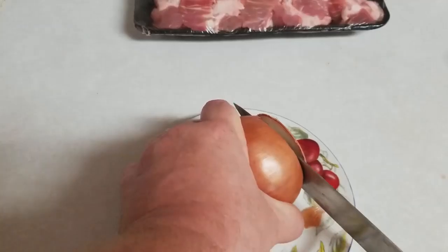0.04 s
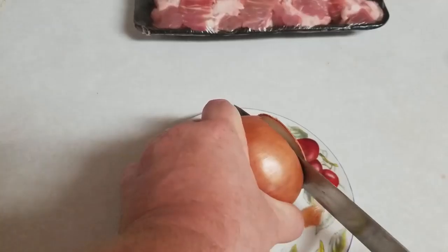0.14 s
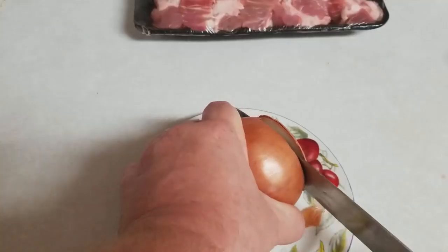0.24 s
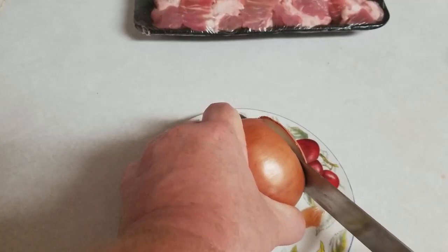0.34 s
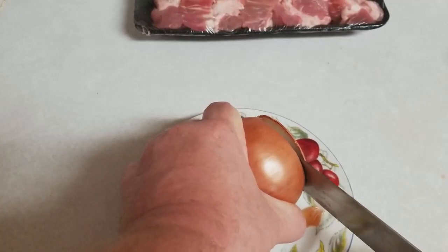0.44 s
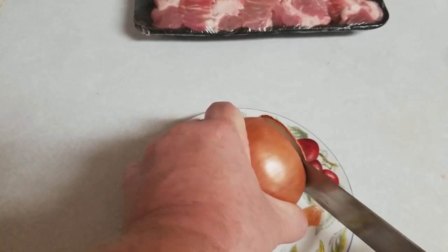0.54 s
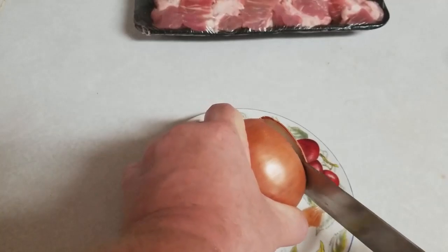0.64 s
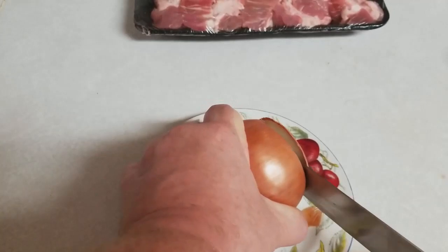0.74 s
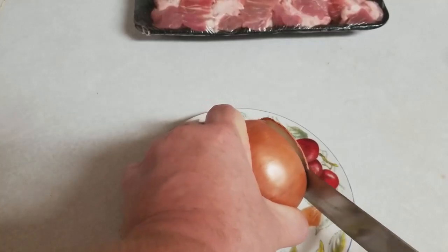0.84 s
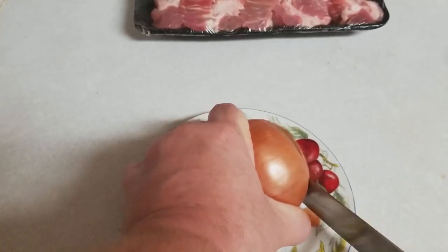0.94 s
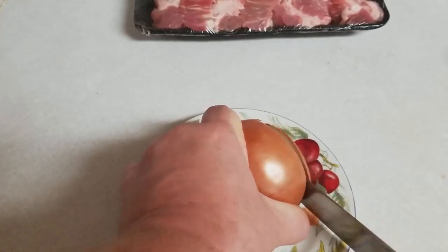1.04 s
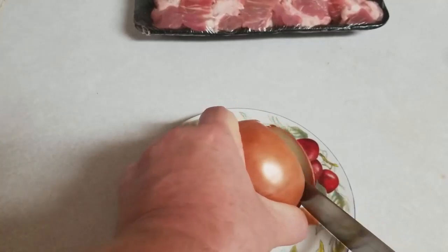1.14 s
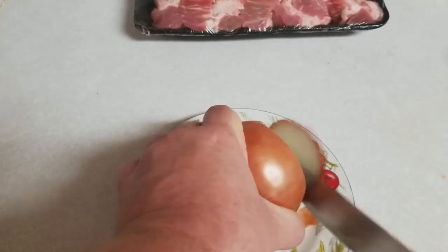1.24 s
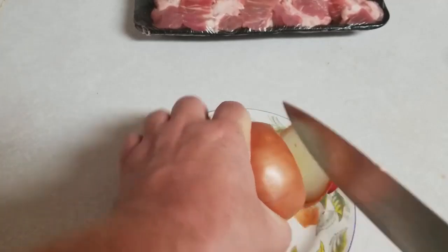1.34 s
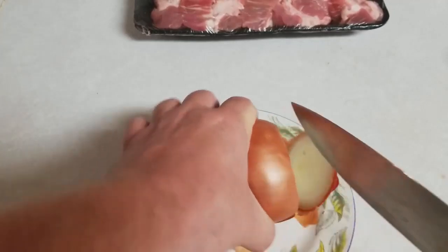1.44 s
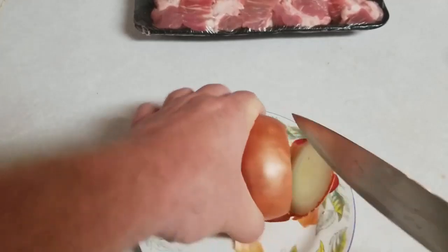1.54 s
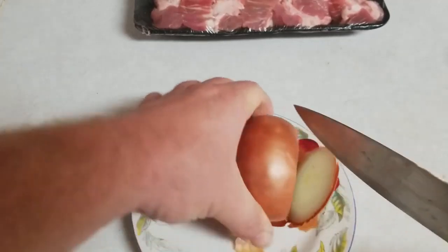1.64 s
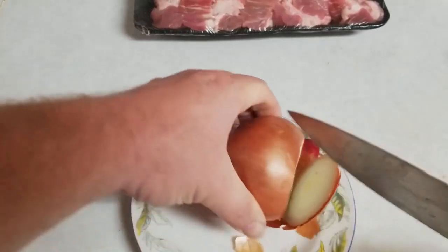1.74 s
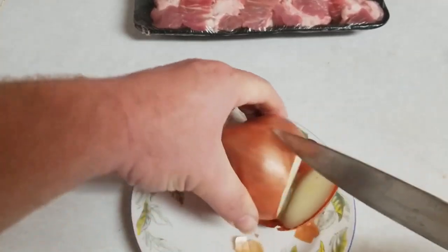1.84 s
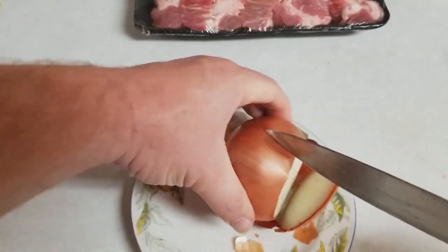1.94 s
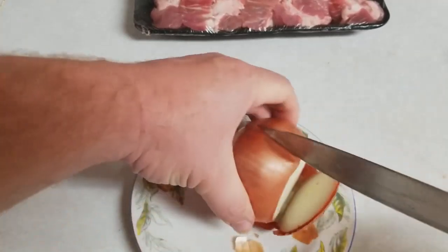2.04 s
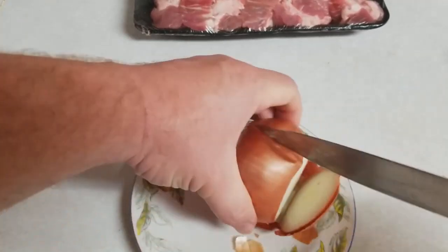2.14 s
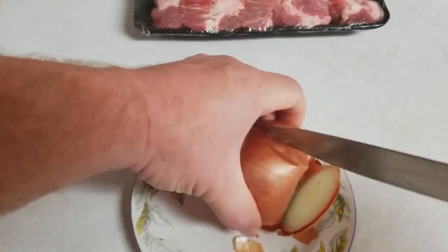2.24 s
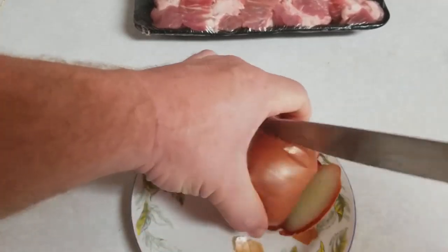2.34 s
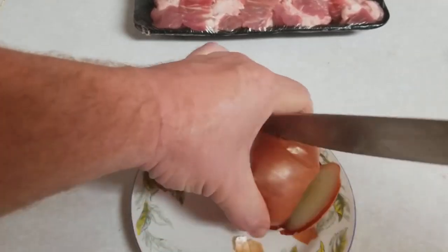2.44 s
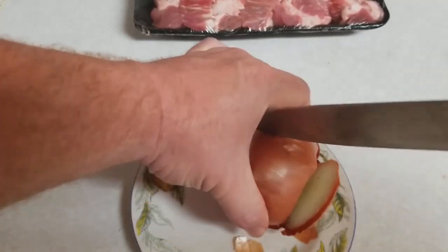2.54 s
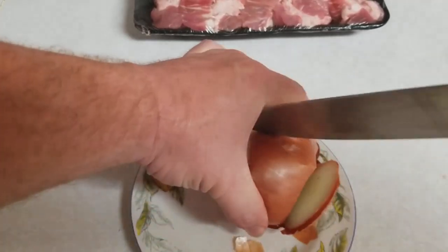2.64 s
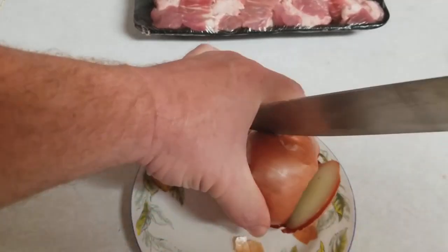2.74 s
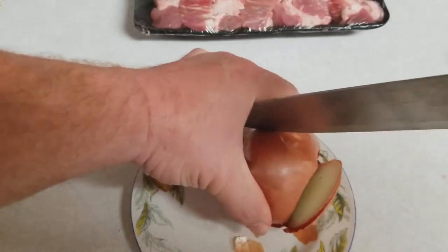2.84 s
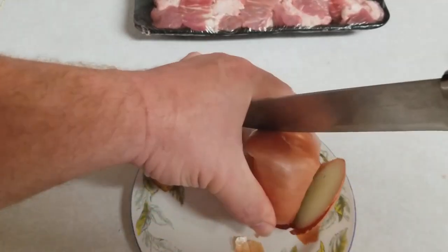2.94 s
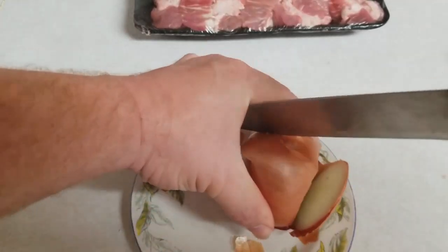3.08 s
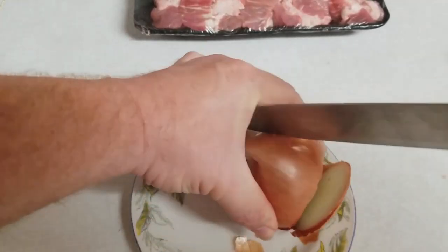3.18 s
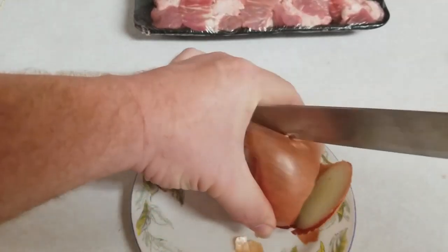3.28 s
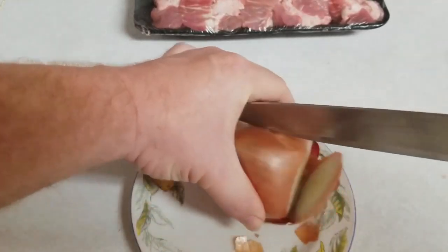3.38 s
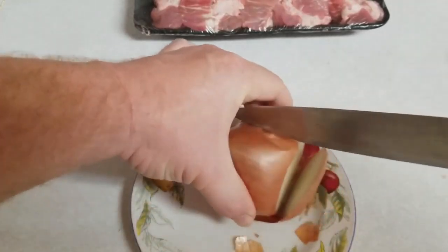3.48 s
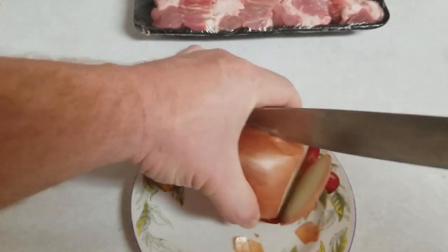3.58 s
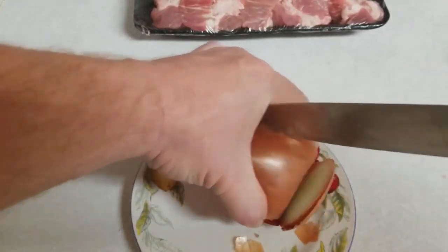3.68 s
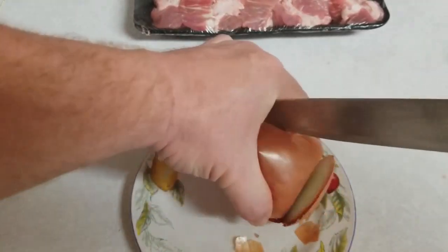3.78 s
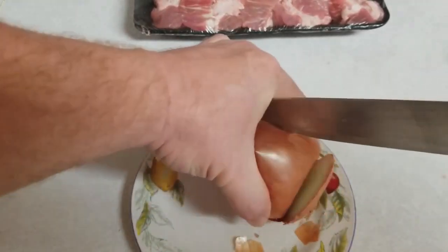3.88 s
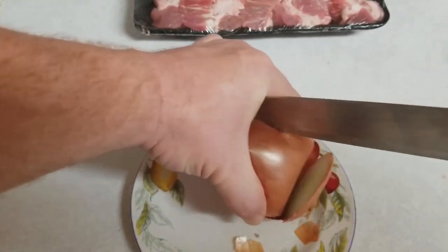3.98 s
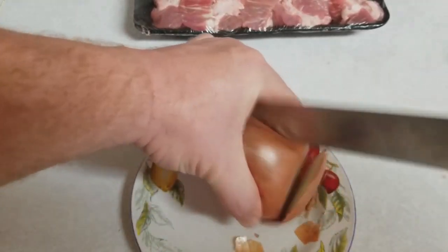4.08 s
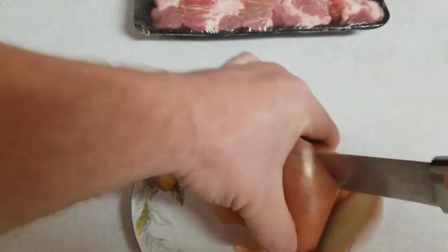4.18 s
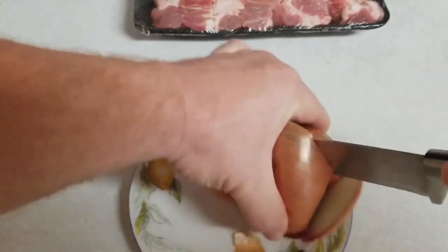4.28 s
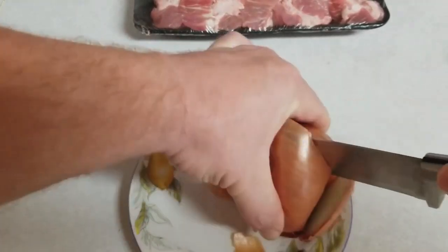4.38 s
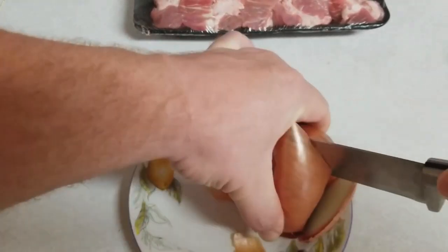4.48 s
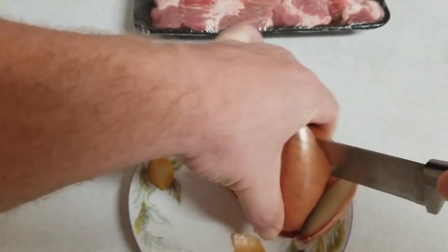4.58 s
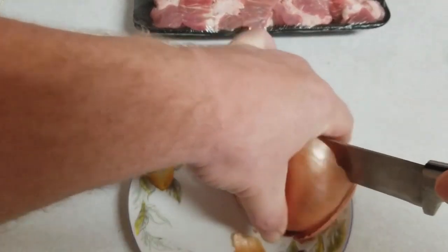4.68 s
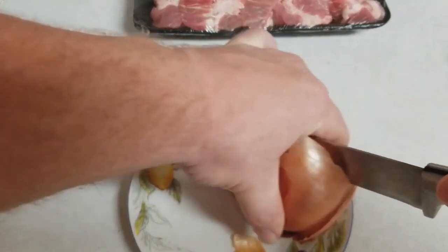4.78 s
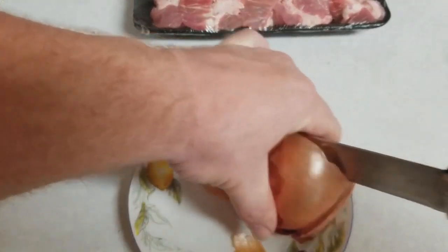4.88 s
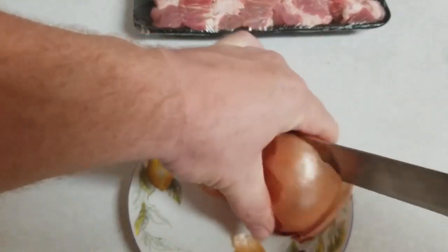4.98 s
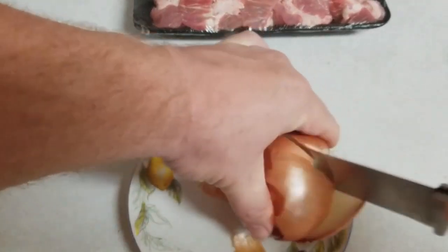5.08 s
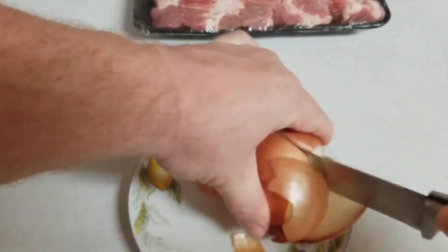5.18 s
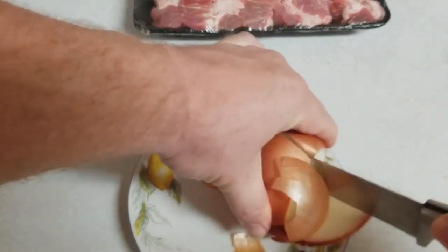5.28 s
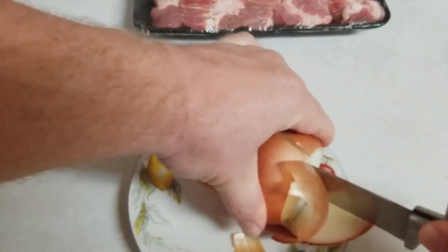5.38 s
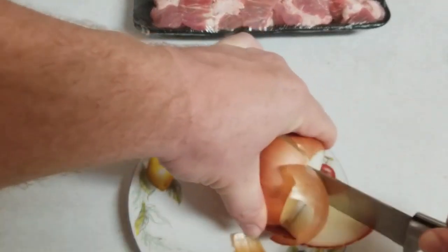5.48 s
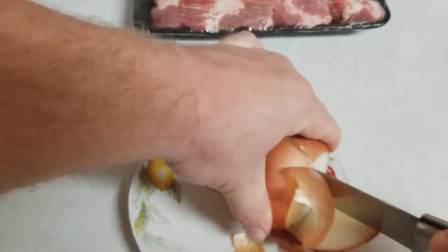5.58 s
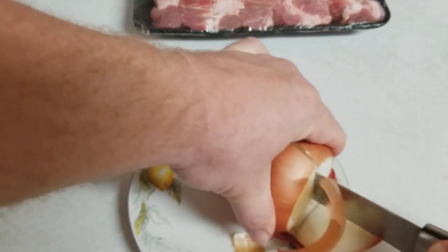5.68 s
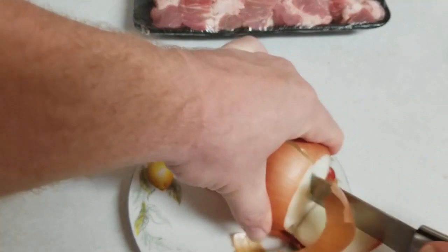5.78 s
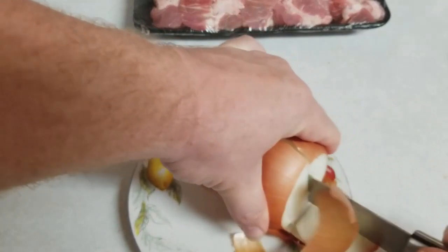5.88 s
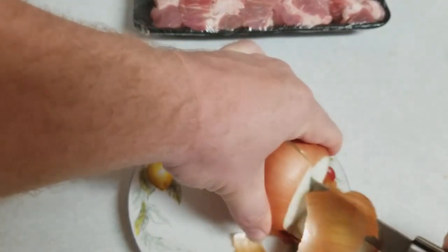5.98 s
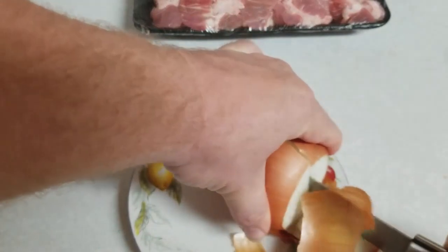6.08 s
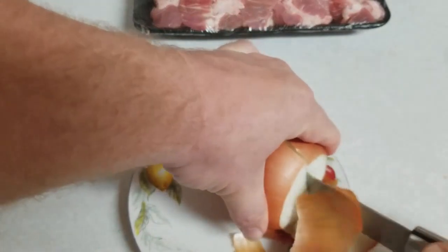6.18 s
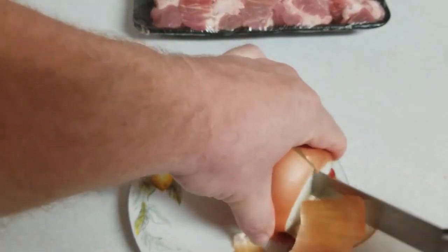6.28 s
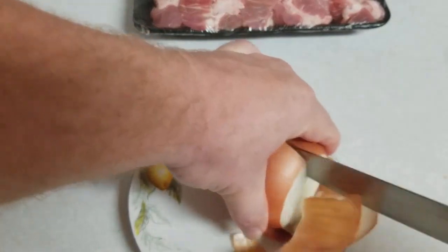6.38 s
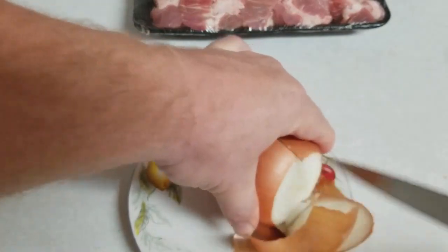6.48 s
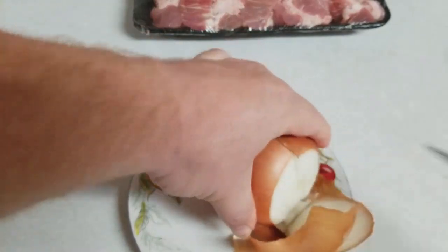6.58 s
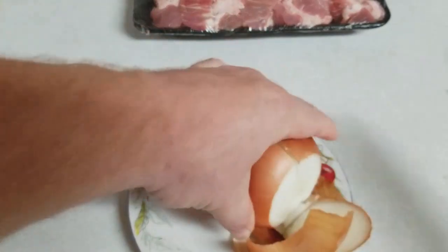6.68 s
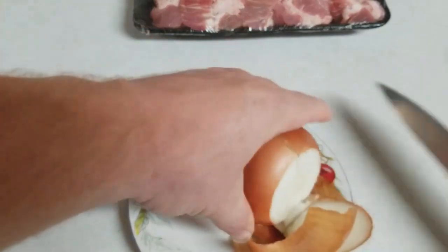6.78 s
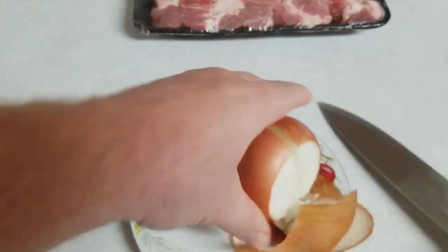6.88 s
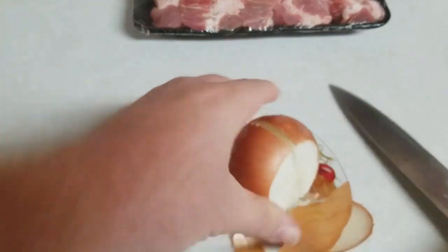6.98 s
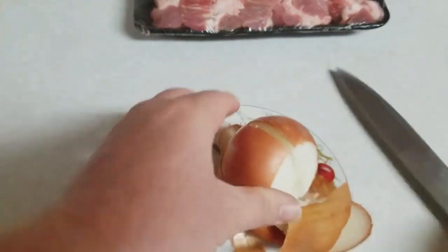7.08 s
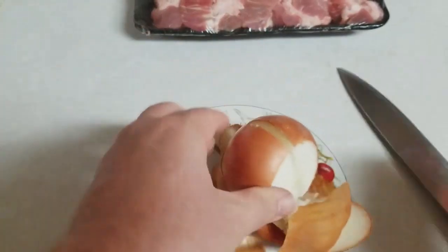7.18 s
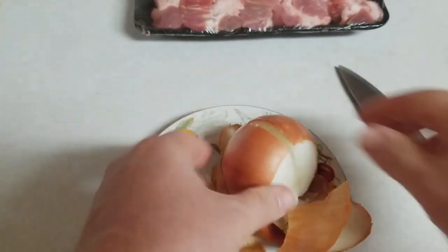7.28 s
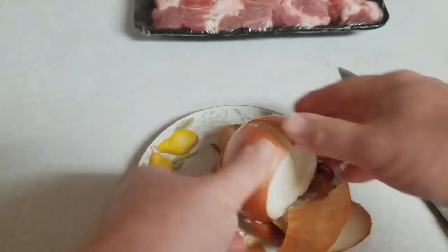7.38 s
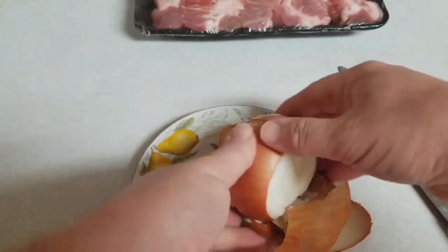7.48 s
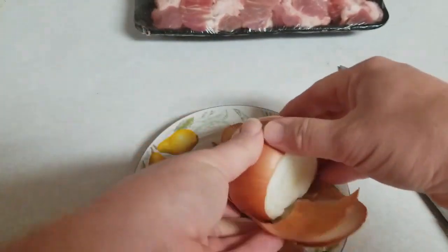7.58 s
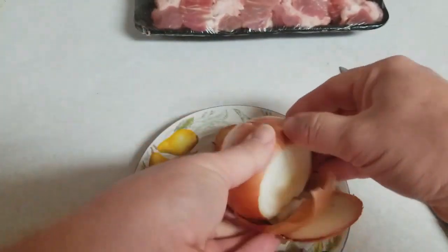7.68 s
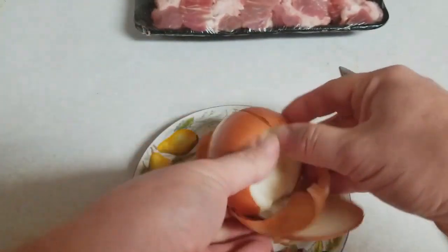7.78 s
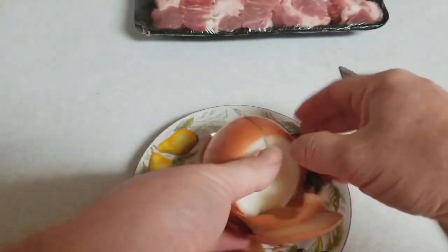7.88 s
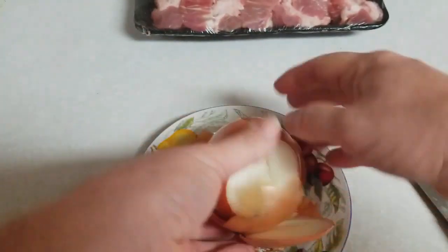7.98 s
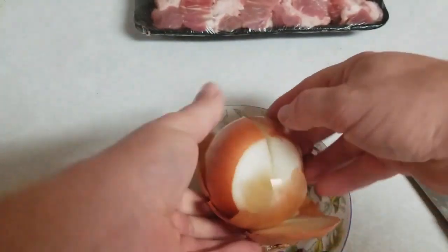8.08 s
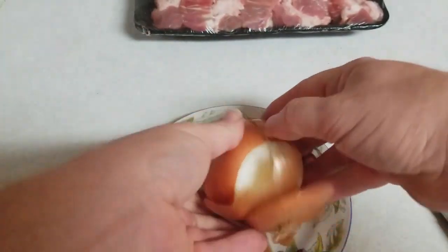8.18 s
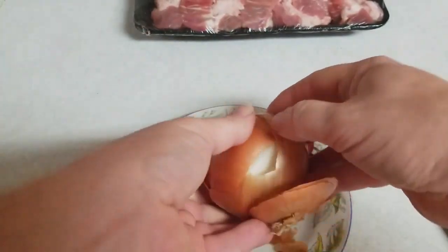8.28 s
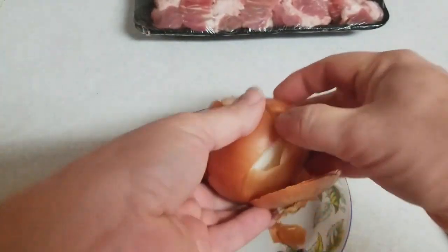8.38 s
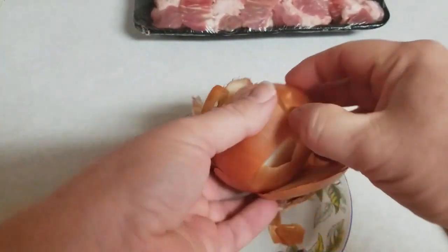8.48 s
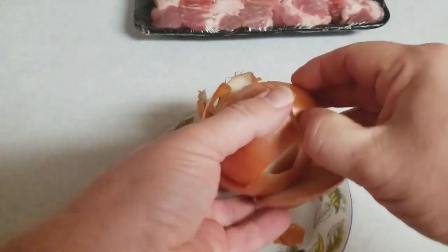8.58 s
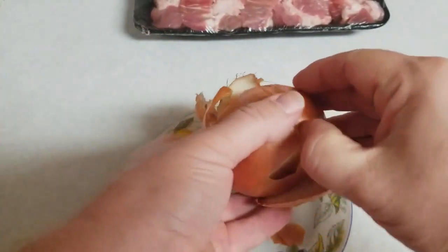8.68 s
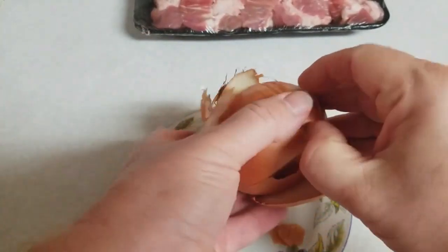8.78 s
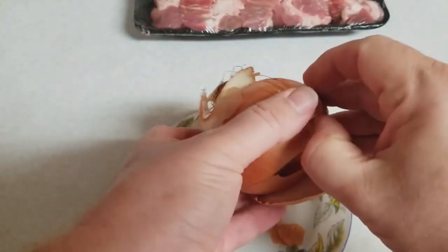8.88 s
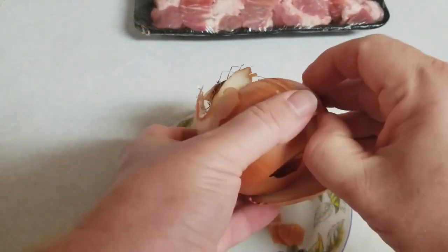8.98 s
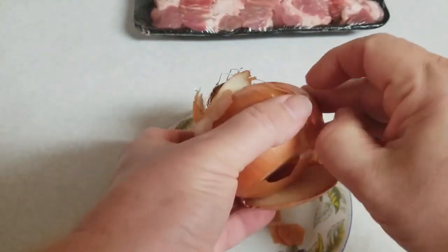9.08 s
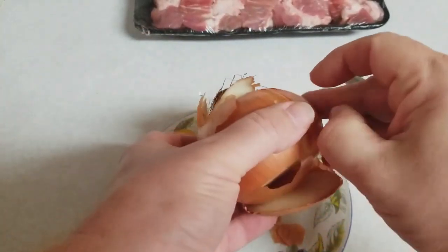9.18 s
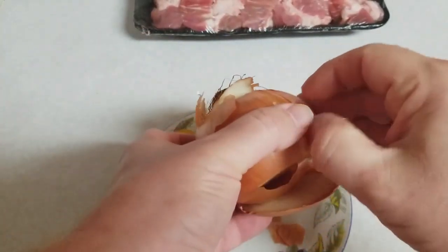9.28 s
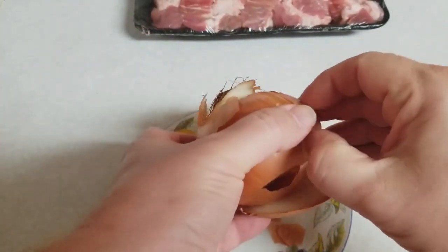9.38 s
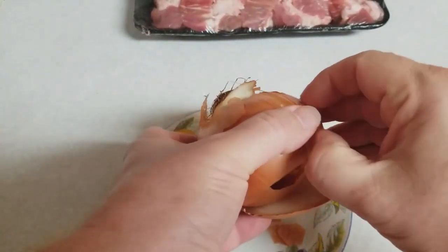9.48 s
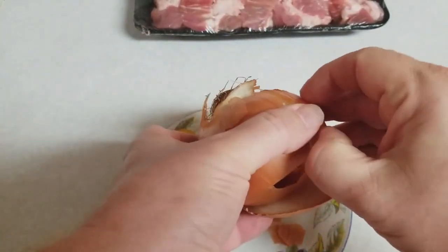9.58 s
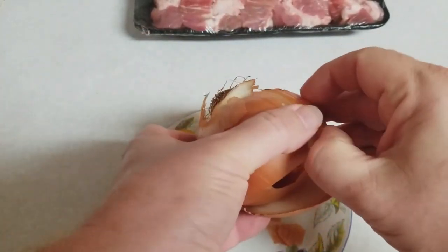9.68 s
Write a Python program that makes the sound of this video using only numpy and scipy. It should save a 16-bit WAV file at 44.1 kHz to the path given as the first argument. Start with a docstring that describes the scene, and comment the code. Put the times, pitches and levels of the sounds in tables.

```python
"""Cutting and peeling an onion

An onion is cut on a ceramic plate and its dry skin is peeled, close under a small stereo microphone.
Skin and flesh snap and rustle and the knife ticks: short bursts of filtered noise over clumps of noisy
grains. The blade and onion thump the table through the plate, and the knife is dragged and laid down
rocking: dying sine tones. A fridge hums in the quiet kitchen: a few wavering sines over steady noise."""
import sys
import numpy as np
from scipy import signal
from scipy.fft import rfft, irfft
from scipy.io import wavfile

SR = 44100
rng = np.random.default_rng(int(sys.argv[2]) if len(sys.argv) > 2 else 0)


def generate_wav(sig):
    """Save sig (samples, or channels by samples) to the path in sys.argv[1] as 16-bit PCM at SR."""
    pcm = np.round(np.clip(np.atleast_2d(sig).T, -1, 1) * 32767).astype(np.int16)
    wavfile.write(sys.argv[1], SR, pcm)


N = 429093   # length in samples

# Fridge hum: (frequency [Hz], mean level [dB rms])
FRIDGE_HUM = [(118.4, -62.5), (177.6, -62), (360.7, -75), (818.3, -80)]
# Shape of the kitchen noise: (frequency [Hz], relative level [dB per Hz])
AIR_SHAPE = [(15, -30.5), (25, 9.5), (70, -2.5), (111, -4.5), (177, 6.5), (280, -8.5), (349, 1.5),
             (600, -14.5), (809, -16.5), (1390, -20.5), (2600, -16.5), (7920, -42.5), (10700, -29),
             (15200, -37), (16500, -59)]
AIR_DB = -56.5
# How alike left and right are in the kitchen noise: (frequency [Hz], likeness [below 0 counts as 0])
AIR_LIKENESS = [(60, 0.83), (180, 0.89), (550, 0.59), (1650, -0.38), (4970, -1.48), (15000, -0.76)]
ROOM_T60_S, ROOM_DB, WALL_CUT_HZ = 0.18, -8.5, 6100

# Tones of the table top: (frequency [Hz], relative level [dB], free time to fall 60 dB [s])
TABLE_MODES = [(86, -29, 0.11), (132, 2.5, 0.12), (223, 4, 0.086), (242.6, 1, 0.099), (340, -2.5, 0.082),
               (459, -2, 0.14), (674, -8.5, 0.1), (761, -4, 0.046), (1049, 6.5, 0.0097),
               (1066, -9.5, 0.097)]
# Borders between the bass, middle and upper table tones: (frequency [Hz])
TABLE_BORDERS_HZ = [170, 300]
# Blows reaching the table top, levels before the common trim: (time [s], peak level [dB],
# middle tones [dB], upper tones [dB], share of free ring time [0-1])
TABLE_BLOWS = [(0.989, -16, 5, -4.5, 0.73), (1.033, -50, 15, -6, 0.88), (1.17, -55, 3, 4, 0.45),
               (1.182, -49, -16, 19.5, 0.81), (2.956, -53, 14, 19.5, 0.59), (3.308, -47, 11, 11, 0.5),
               (3.371, -54.5, 4, 16, 0.52), (3.457, -48.5, -8, 5.5, 0.64), (4.122, -15.5, 3, -8.5, 0.91),
               (4.142, -28, -20, -26, 0.73), (4.186, -21, -6, -27, 0.29), (4.28, -46, 8, 5, 1),
               (4.311, -48.5, 13, 19.5, 0.78), (4.345, -47, 6, 9.5, 1), (5.339, -29, -21, -19, 0.93),
               (5.815, -39, -6, -9, 0.83), (5.876, -47, 11, 6.5, 1), (5.964, -40, 8.5, -3, 0.75),
               (6.167, -30.5, -5, -4.5, 1), (6.192, -32, 10, 13, 0.66), (6.265, -29.5, 8, -3.5, 0.59),
               (6.92, -22.5, -15, -1.5, 1), (7.205, -29.5, 6, -1, 1), (7.252, -44.5, 18.5, 14, 0.96),
               (7.708, -51.5, 5, 13.5, 0.44), (7.749, -54, -11, 12.5, 1), (7.874, -19, -13, -39, 0.51),
               (7.912, -38, -5, -20, 0.55), (8.016, -53, -8, 12.5, 0.83), (8.384, -58.5, 18, 21, 0.52),
               (8.425, -54.5, 10, 8, 0.51), (8.46, -58, 8, 7, 0.76), (9.075, -55.5, 10, 17, 0.69)]

# Tones of the knife: (frequency [Hz], relative level [dB], free time to fall 60 dB [s])
KNIFE_MODES = [(473.5, 5, 0.15), (550, 2.5, 0.064), (634, 10.5, 0.036), (793, -3.5, 0.13), (810, -3, 0.042),
               (873, -4, 0.14), (970, -12, 0.051), (1036, -0.5, 0.082), (1075, 6, 0.048),
               (1296, -10.5, 0.07), (1440, -8.5, 0.068), (1493, -1.5, .07), (1673, -9, 0.058),
               (1820, -13.5, 0.096), (2060, -0.5, 0.036), (2434, -8.5, 0.07), (2780, -1, 0.037),
               (3040, -4, 0.046), (3450, -13, 0.063), (3840, -17, 0.037)]
KNIFE_DEEP_HZ, KNIFE_BRIGHT_HZ = 700, 1900   # deep tones lie below the first, bright ones above the second
# Knife rocking on the table, levels before the common trim: (time [s], peak level [dB],
# bright tones [dB], deep tones [dB], share of free ring time [0-1])
KNIFE_KNOCKS = [(6.92, -23, 3.5, -15, 0.84), (7.111, -4, -12.5, -11.5, 0.66), (7.132, -11.5, 5, -13, 0.48),
                (7.169, -19, -1, -11.5, 0.52), (7.211, -4.5, -9.5, -11, 0.36),
                (7.246, -13.5, 2.5, -18, 0.62), (7.284, -16, -9.5, -12, 1), (7.342, -8.5, -6, -13, 0.72),
                (7.428, -32, -29, -12, 0.46), (7.439, -30.5, -24, 1, 0.6)]
# Knife dragged over the table: (time [s], level [dB])
KNIFE_DRAG = [(6.83, -54), (7.174, -27), (7.5, -50.5)]
GRIP_DETUNE = 0.025   # typical share by which each new way of resting shifts a tone

# Resonance under the hand: (time [s], frequency [Hz])
HAND_HOLLOW = [(0.0, 2050), (1.9, 3060), (2.22, 2150), (3.3, 3340), (6.07, 2280), (6.18, 1430),
               (6.42, 3030), (7.04, 1430), (7.5, 1440), (7.61, 2470), (8.5, 1970), (8.68, 1560),
               (9.1, 1540), (9.29, 1760), (9.73, 1830)]
# Shape of the rustle's body: (frequency [Hz], relative level [dB per Hz])
BODY_SHAPE = [(410, -38.5), (700, -2), (844, -1), (961, 2.5), (1100, 0.5), (1480, 0.5), (1750, -2.5),
              (2510, 0), (2830, -1), (4520, -5.5), (6500, -10), (8450, -37.5), (14300, -120)]
# Shape of the rustle's treble, also used for the cracks: (frequency [Hz], relative level [dB per Hz])
TREBLE_SHAPE = [(2650, -27.5), (4500, -10.5), (6880, -11), (7670, -14), (11500, -6), (15400, -22),
                (16100, -19), (16500, -63)]
# Separate rustles (blade strokes, tugs at the skin, shoves of the onion), levels before the source trims:
# (peak time [s], body [dB], treble [dB], table shake [dB], swell [s], fade [s])
RUSTLE_STROKES = [(.479, -51.5, -50.5, -55, 0.01, 0.17), (.629, -43.5, -45, -47, 0.12, 0.068),
                  (.986, -27, -23.5, -27.5, 0.092, 0.062), (1.181, -43, -53, -46, 0.39, 0.086),
                  (1.309, -56.5, -57.5, -58, 0.3, 0.65), (1.798, -39, -36, -71, 0.022, 0.037),
                  (1.866, -48, -52.5, -52, 0.025, 0.53), (2.335, -46, -52, -81, 0.25, 0.26),
                  (2.871, -36, -45, -39, 0.02, 0.065), (2.971, -49, -49, -47, 0.062, 0.16),
                  (3.374, -40.5, -41.5, -52, 0.099, 0.17), (3.542, -102, -48, -73, 0.017, 0.9),
                  (3.65, -42, -51, -63, 0.16, 0.16), (3.73, -39, -61, -67, 0.11, 0.048),
                  (4.051, -34.5, -44, -34, 0.049, 0.23), (4.137, -23.5, -26.5, -22, 0.019, 0.12),
                  (4.215, -37, -32, -34, 0.089, 0.05), (4.326, -52, -50, -26.5, 0.081, 0.05),
                  (4.681, -48.5, -48.5, -63, 0.18, 0.19), (4.909, -48.5, -49, -75, 0.061, 0.22),
                  (5.128, -41, -46.5, -35.5, 0.093, 0.12), (5.36, -35.5, -41, -33, 0.049, .1),
                  (5.647, -46.5, -49, -39.5, 0.13, 0.14), (5.929, -36.5, -37.5, -37, 0.094, .06),
                  (6.044, -46, -45.5, -40, .06, 0.078), (6.17, -45, -55, -50, 0.015, 0.16),
                  (6.24, -52, -66, -40, 0.069, 0.2), (6.378, -53, -54, -53, 0.16, 0.32),
                  (6.655, -69, -52.5, -63, .03, 0.087), (6.849, -41, -44, -59, 0.0045, 0.13),
                  (6.92, -39, -65, -48.5, 0.07, 0.22), (7.03, -27.5, -32, -24.5, 0.086, 0.075),
                  (7.124, -33.5, -51, -31, 0.016, 0.24), (7.32, -49.5, -54, -37.5, 0.92, 0.09),
                  (7.559, -42, -37.5, -65, 0.021, 0.04), (7.766, -52, -53, -59.5, 0.33, 0.11),
                  (7.89, -51.5, -52, -52, 0.25, 0.086), (8.267, -45.5, -47.5, -44, 0.081, 0.1),
                  (8.39, -48.5, -54, -52, 0.084, 0.033), (8.505, -57, -55.5, -47, 0.057, 0.055),
                  (8.626, -53.5, -57, -70, 0.053, 0.24), (9.091, -33.5, -33.5, -39, 0.048, 0.044),
                  (9.267, -57, -65, -54, 0.12, 0.11), (9.516, -56, -51, -46, 0.024, .1)]
STROKE_RANGE_DB = 20   # a rustle climbs this much over its swell and sinks this much over its fade
# Faint background rustle of handling, under the separate rustles, levels before the source trims:
# (time [s], body [dB], treble [dB], table shake [dB])
HANDLING_RUSTLE = [(0, -68.5, -80, -52.5), (.45, -66.5, -69, -67), (.75, -55.5, -65, -74),
                   (1.7, -71, -63.5, -66), (2.05, -83, -71, -55), (2.75, -63, -62, -58),
                   (3.2, -64.5, -66, -59), (3.9, -59, -120.5, -51.5), (4.45, -69, -83, -52),
                   (5.05, -70, -75, -53.5), (5.5, -82, -66, -59), (5.8, -48, -59, -44),
                   (6.8, -102, -90.5, -73.5), (7.5, -71.5, -77, -47.5), (8.1, -67, -64, -65),
                   (8.85, -60, -68, -62), (9.45, -70, -70, -70), (9.73, -68, -77, -51)]
# Snaps of skin and flesh, and ticks of the knife, levels before the common trims:
# (time [s], peak level [dB], body pitch [Hz], treble level [dB], time for the body to fall 60 dB [s])
SNAP_EVENTS = [(0.1758, -34.5, 1430, -37.5, 0.013), (0.4711, -22.5, 2100, -36.5, 0.04),
               (0.595, -27, 2310, -45, 0.03), (0.6126, -24, 4860, -51, 0.049),
               (0.6415, -25.5, 4530, -55, 0.018), (0.8124, -25.5, 3730, -46, 0.051),
               (0.8488, -30, 1510, -31.5, 0.025), (0.9205, -13.5, 3140, -41, 0.047),
               (0.966, -12, 2260, -35, 0.053), (0.985, -12, 2110, -21.5, 0.057),
               (1.008, -24, 1880, -25, 0.021), (1.1925, -29, 2680, -42, 0.024),
               (1.2984, -22.5, 2540, -38, 0.039), (1.3131, -29, 2650, -34.5, 0.04),
               (1.3682, -25, 3850, -31, 0.027), (1.456, -31, 3000, -42, 0.044),
               (1.512, -42, 5560, -42.5, 0.025), (1.6141, -28, 2120, -27.5, 0.036),
               (1.7858, -16, 3830, -26.5, 0.045), (1.8, -20, 3300, -43, 0.015),
               (1.812, -23, 3360, -41, 0.023), (1.848, -19, 3380, -35, 0.013),
               (1.8702, -15.5, 3080, -32, 0.04), (2.1115, -21, 2130, -61, 0.031),
               (2.152, -41, 3500, -44, 0.02), (2.2668, -28.5, 1970, -63, 0.092),
               (2.3497, -15.5, 2320, -34, 0.058), (2.3541, -10, 2080, -36.5, 0.012),
               (2.4464, -23, 4220, -40, 0.054), (2.54, -37, 3500, -64, 0.02),
               (2.692, -37, 3020, -49, 0.019), (2.7482, -26.5, 3940, -46.5, 0.028),
               (2.8596, -19, 4160, -47, 0.036), (2.8838, -18.5, 2320, -32.5, 0.015),
               (2.9614, -10.5, 2450, -35, 0.031), (2.9806, -30, 4330, -31.5, 0.021),
               (3.3101, -12.5, 3540, -26.5, 0.035), (3.4433, -32, 4330, -45, 0.045),
               (3.457, -23.5, 4030, -45, 0.049), (3.4698, -19, 4670, -49, 0.021),
               (3.5348, -10.5, 6000, -20.5, 0.024), (3.5931, -14.5, 4360, -31, 0.021),
               (3.6703, -25, 3800, -36, 0.035), (3.7252, -35, 2430, -34, 0.024),
               (4.0056, -34, 5200, -32.5, 0.039), (4.043, -21.5, 2300, -34.5, 0.05),
               (4.0557, -10.5, 3270, -31, 0.018), (4.075, -12.5, 3180, -42, 0.03),
               (4.091, -12, 3180, -41, 0.023), (4.1227, -5, 2410, -38, 0.053),
               (4.189, -13, 2780, -26.5, 0.096), (4.3105, -40, 5750, -38.5, 0.022),
               (4.514, -30.5, 3000, -44, 0.081), (4.6742, -19, 4070, -24.5, 0.018),
               (4.7788, -32, 2210, -33, 0.024), (4.8986, -41, 4070, -34.5, 0.024),
               (4.9137, -43, 4090, -40, 0.024), (5.33, -20, 2740, -48, 0.017),
               (5.3599, -16.5, 2790, -26, 0.014), (5.4204, -18, 2980, -30.5, 0.012),
               (5.6388, -11.5, 2500, -28.5, 0.059), (5.642, -13, 2320, -46, 0.035),
               (5.692, -20, 2200, -38.5, 0.056), (5.9156, -18, 2480, -28.5, 0.026),
               (5.9356, -18.5, 1300, -27, 0.023), (6.0286, -13.5, 2360, -25.5, 0.016),
               (6.0966, -38, 5800, -40, 0.021), (6.1594, -30.5, 2440, -38, 0.021),
               (6.1934, -19, 1000, -52, 0.055), (6.2236, -31, 860, -39, 0.029),
               (6.255, -29, 2200, -58, 0.016), (6.2768, -29, 2460, -47, 0.024),
               (6.358, -24.5, 2650, -44, 0.05), (6.3886, -13.5, 2760, -37, 0.038),
               (6.64, -37, 2950, -53, 0.024), (6.6539, -29, 2400, -29.5, 0.032),
               (6.9206, -22, 1260, -37.5, 0.064), (7.0208, -20, 1350, -38, 0.06),
               (7.1115, -6.5, 970, -32, 0.056), (7.1315, -17, 1570, -47, 0.035),
               (7.2088, -9, 960, -44, 0.035), (7.546, -35, 3120, -54, 0.022),
               (7.759, -27, 5400, -30, 0.021), (8.0664, -32.5, 1790, -47.5, 0.024),
               (8.17, -38, 2500, -50, 0.062), (8.263, -30, 1520, -57, 0.027),
               (8.3689, -36, 4740, -38, 0.048), (8.6205, -32.5, 5700, -26.5, 0.011),
               (8.6324, -33, 4100, -34, 0.029), (8.6835, -34, 1520, -60, 0.023),
               (8.9314, -33.5, 3700, -47, 0.022), (8.9463, -39, 1670, -42, 0.045),
               (8.9912, -28.5, 1650, -36.5, 0.035), (9.0466, -21, 1820, -34, 0.041),
               (9.087, -18, 1460, -18.5, 0.025), (9.188, -53, 1720, -37, 0.039),
               (9.29, -39, 2500, -64, 0.019), (9.5076, -16, 1860, -25.5, 0.018)]

CUTOFF_HZ = 17000


def amp(db):
    """Turn decibels into a gain."""
    return 10 ** (np.asarray(db) / 20)


def rms_one(x):
    """Scale a sound to an average (rms) strength of 1."""
    return x / np.sqrt(np.mean(x ** 2) + 1e-20)


def in_time(rows):
    """Draw each column of a time table as a curve with a value at every sample."""
    s, *columns = np.transpose(rows)
    return [np.interp(np.arange(N) / SR, s, column) for column in columns]


def at_hz(points):
    """Read a frequency table at every frequency of the FFT."""
    hz, value = np.transpose(points)
    grid_hz = np.arange(N // 2 + 1) * SR / N
    return np.interp(np.log(grid_hz + 1), np.log(hz), value)


def colour(x, shape):
    """Make some frequencies stronger than others, following a table; the result has rms 1."""
    return rms_one(irfft(rfft(x) * amp(at_hz(shape)), N))


def band_pass(x, order, low_hz, high_hz):
    """Keep mainly what lies between two frequencies."""
    return signal.sosfilt(signal.butter(order, [low_hz, high_hz], "band", fs=SR, output="sos"), x)


def drift(rate_hz):
    """Slow random wandering of spread 1: smoothed noise, worked out every 40 samples."""
    r = np.exp(-80 * np.pi * rate_hz / SR)
    noise = rng.standard_normal(N // 40 + 2002)
    slow = signal.lfilter([1], [1, -2 * r, r * r], noise)[2000:]   # skip the filter's start
    return np.interp(np.arange(N) / 40, np.arange(len(slow)), rms_one(slow))


def place(x, pan_db, lag):
    """Make left pan_db louder than right, and let left hear the sound lag samples later."""
    turn = np.exp(-2j * np.pi * lag * np.arange(N // 2 + 1) / N)
    late = irfft(rfft(x) * turn, N)
    return np.array([late * amp(pan_db / 2), x * amp(-pan_db / 2)])


def air():
    """Steady kitchen noise, most alike left and right in the bass, and a fridge hum of wavering sines."""
    mid, side = rfft(rng.standard_normal((2, N))) * amp(at_hz(AIR_SHAPE))
    alike = np.clip(at_hz(AIR_LIKENESS), 0, 1)
    noise = irfft(np.sqrt(1 + alike) * mid + np.sqrt(1 - alike) * side * [[1], [-1]], N)
    t = np.arange(N) / SR
    hum = 0
    for hz, db in FRIDGE_HUM:
        height = np.sqrt(2) * amp(db + 0.87 * drift(2))
        hum = hum + height * np.sin(2 * np.pi * hz * t + 1.5 * drift(2.04))
    return amp(AIR_DB) * rms_one(noise) + hum


def kitchen(x):
    """Room echo: a tail of dying noise, different left and right, duller than the direct sound."""
    t = np.arange(int(.5 * SR)) / SR
    tail = rng.standard_normal((2, len(t))) * amp(-60 * t / ROOM_T60_S) * (t > .003)
    tail = tail / np.sqrt(np.sum(tail[0] ** 2))
    tail = signal.lfilter(*signal.butter(1, WALL_CUT_HZ, fs=SR), tail)
    return amp(ROOM_DB) * signal.fftconvolve(tail, x[None])[:, :N]


def ring(force, hz, t60):
    """A resonator: a unit click sets off a dying sine that starts from height 1."""
    r, w = amp(-60 / (t60 * SR)), 2 * np.pi * hz / SR
    return signal.lfilter([0, np.sin(w)], [1, -2 * r * np.cos(w), r * r], force + 1e-18)


def rubbed(modes, level_db, judder_db):
    """Rubbing: a juddering noise force keeps the tones ringing, damped by the contact."""
    force = rng.standard_normal(N) * amp(judder_db * drift(44.5))
    sound = sum(amp(db) * ring(force, hz, 0.48 * t60) for hz, db, t60 in modes)
    return amp(level_db) * rms_one(sound)


def struck(rows, modes, group, base_db, spread_db, contact_s, chatter):
    """Each blow sets the groups of tones ringing as its row says; the hand shortens the ringing."""
    hz, level_db, t60 = np.transpose(modes)[:, :, None]
    t, touch = np.arange(int(.25 * SR)) / SR, np.arange(int(.03 * SR)) / SR
    out = np.zeros(N + SR)
    signs = (-1.) ** np.arange(len(modes))[:, None]
    for s, peak_db, *group_db, ring_share in rows:
        group_gain_db = np.array([0, *group_db])[group][:, None]
        strength_db = level_db + group_gain_db + spread_db * rng.standard_normal(hz.shape)
        fall = amp(strength_db - 60 * t / (t60 * ring_share))
        held_hz = hz * (1 + GRIP_DETUNE * rng.standard_normal(hz.shape))
        tones = np.sum(signs * fall * np.sin(2 * np.pi * held_hz * t), axis=0)
        # one hard hit, then the contact chatters
        force = chatter * rng.standard_normal(len(touch)) * amp(-60 * touch / contact_s)
        force[0] = 1
        blow = signal.fftconvolve(tones, force) / np.sqrt(np.sum(force ** 2))
        i = int(s * SR)
        out[i:i + len(blow)] += amp(peak_db + base_db) * blow
    return out[:N]


def table_top(shake_db):
    """Blows ring all the table's tones; shaking keeps its five lowest going, through a soft contact."""
    group = np.digitize(np.array(TABLE_MODES)[:, 0], TABLE_BORDERS_HZ)
    sound = struck(TABLE_BLOWS, TABLE_MODES, group, base_db=-1, spread_db=2.0, contact_s=0.013, chatter=0.055)
    sound = sound + rubbed(TABLE_MODES[:5], shake_db - 5.0, judder_db=2.5)
    return band_pass(sound, 2, 70, 1500)


def knife():
    """The rocking knife rings in short knocks; dragging it keeps the same tones going."""
    hz = np.array(KNIFE_MODES)[:, 0]
    group = (hz > KNIFE_BRIGHT_HZ) + 2 * (hz < KNIFE_DEEP_HZ)
    sound = struck(KNIFE_KNOCKS, KNIFE_MODES, group, base_db=-7.5, spread_db=3.0, contact_s=0.018, chatter=0.09)
    t = np.arange(N) / SR
    dragging = (t > KNIFE_DRAG[0][0]) * (t < KNIFE_DRAG[-1][0])
    sound = sound + dragging * rubbed(KNIFE_MODES, in_time(KNIFE_DRAG)[0], judder_db=5)
    return signal.lfilter(*signal.butter(2, 250, "high", fs=SR), sound)   # a narrow blade radiates no bass


def handling():
    """Levels of body, treble and table shake: rustles swell and fade over a faint, changing rustle of handling."""
    t = np.arange(0, N, 32) / SR
    s, *peak_db, swell, fade = np.transpose(RUSTLE_STROKES)[:, :, None]
    # distance from the peak: 1 is a whole swell before it or a whole fade after it
    away = np.maximum((s - t) / np.maximum(swell, .005), (t - s) / np.maximum(fade, .005))
    power = amp(2 * np.array(peak_db)[:, :, 0]) @ amp(-2 * STROKE_RANGE_DB * away)
    power = [np.interp(np.arange(N) / SR, t, p) for p in power]
    background_power = amp(2 * np.array(in_time(HANDLING_RUSTLE)))
    return 10 * np.log10(power + background_power)


def hollow(x, lift_db, width):
    """The gap between hand, blade and onion resonates; its pitch moves as the grip changes."""
    out, log_hz = x.copy(), np.log(in_time(HAND_HOLLOW)[0])
    for hz in np.geomspace(1300, 4200, num=6):
        nearness = np.exp(-((log_hz - np.log(hz)) / 0.27) ** 2)   # bands near the moving pitch are lifted
        lift = amp(lift_db + 6.5 * drift(5.3))
        out += lift * nearness * band_pass(x, 1, hz / (1 + width), hz * (1 + width))
    return rms_one(out)


def rustle(body_db, treble_db, per_s, uneven_db, clump_db, crumple_s, hiss, alike):
    """Clumped grains of tearing skin, of very uneven size, over the hiss of skin sliding."""
    born = rng.random(N) < per_s * amp(clump_db * drift(25)) / SR
    grains = born * amp(uneven_db * np.minimum(rng.exponential(1, N), 4))
    # each grain crumples for a few ms
    crumple = signal.lfilter([1], [1, -amp(-60 / (crumple_s * SR))], grains)
    shared, *own = (rms_one(crumple) + hiss) * rng.standard_normal((3, N))
    both = alike * place(shared, 0, 1.5) + (1 - alike) * np.array(own)
    body = amp(body_db) * hollow(colour(both, BODY_SHAPE), 2.2, 0.11)
    treble = amp(treble_db) * colour(both, TREBLE_SHAPE)
    return (body + treble) * amp([[-2.1], [2.1]])   # right is louder


def snaps(width, chatter_db, break_db, body_db, treble_db, alike, pan_db):
    """Each snap or tick: a sharp start, then a ragged burst dying at its own pitch, with a bright crack."""
    size = 2048
    out, t = np.zeros((2, N + size)), np.arange(size) / SR
    bright = colour(rng.standard_normal((2, N)), TREBLE_SHAPE)
    for s, peak_db, hz, top_db, t60 in SNAP_EVENTS:
        i = int(s * SR)
        shared, *own = rng.standard_normal((3, size))
        shared = np.array([np.roll(shared, rng.integers(0, 4)), shared])   # left lags by 0 to 3 samples
        white = alike * shared + (1 - alike) * np.array(own)
        # slips under a millisecond
        slips = np.clip(rng.standard_normal(size // 32), -2, 1)
        ragged = amp(chatter_db * np.repeat(slips, 32))
        ragged *= 1 + amp(break_db - 60 * t / 0.0023)   # the start is the hardest
        body = band_pass(white * ragged * amp(-60 * t / t60), 1, hz / (1 + width), hz * (1 + width))
        body = signal.lfilter(*signal.butter(2, 700, "high", fs=SR), body)   # little bass is heard
        crack = bright[:, (i + np.arange(size)) % N] * ragged * amp(-60 * t / (1.27 * t60))
        burst = amp(peak_db + body_db) * body / np.abs(body).max() + amp(top_db + treble_db) * crack
        side_db = pan_db + 1.8 * rng.standard_normal()
        out[:, i:i + size] += amp([[side_db / 2], [-side_db / 2]]) * burst
    return out[:, :N]


def scene():
    """Everything on the table, its echo in the kitchen and the room noise."""
    body_db, treble_db, shake_db = handling()
    table = table_top(shake_db)
    near = place(table, -0.57, 0) + place(knife(), -4.5, 3.8)
    near = near + rustle(body_db, treble_db, per_s=800, uneven_db=3.0, clump_db=3, crumple_s=0.024,
                         hiss=0.3, alike=0.4)
    near = near + snaps(width=0.24, chatter_db=3.5, break_db=3.65, body_db=-2.2, treble_db=-2.0,
                        alike=0.79, pan_db=-4.5)
    echo = kitchen(near.mean(axis=0) - 0.36 * table)   # the table echoes less than the rest
    return near + echo + air()


def record(dry):
    """The microphone drops the deepest bass, rounds the loudest peaks, and the top is cut."""
    heard = signal.lfilter(*signal.butter(3, 45, "high", fs=SR), dry)
    heard = np.tanh(heard)
    return signal.sosfilt(signal.cheby2(16, 90, CUTOFF_HZ, fs=SR, output="sos"), heard)


dry = scene()
out = record(dry)
generate_wav(out)
```